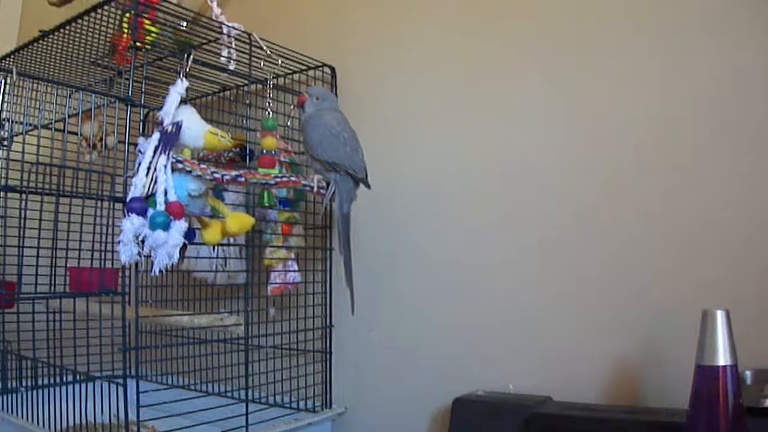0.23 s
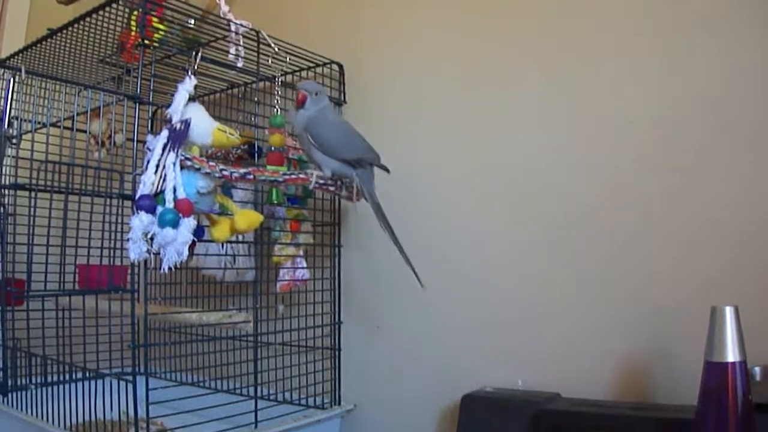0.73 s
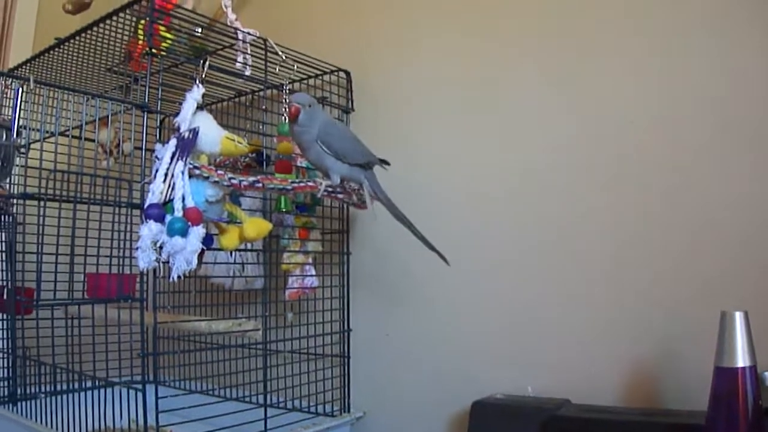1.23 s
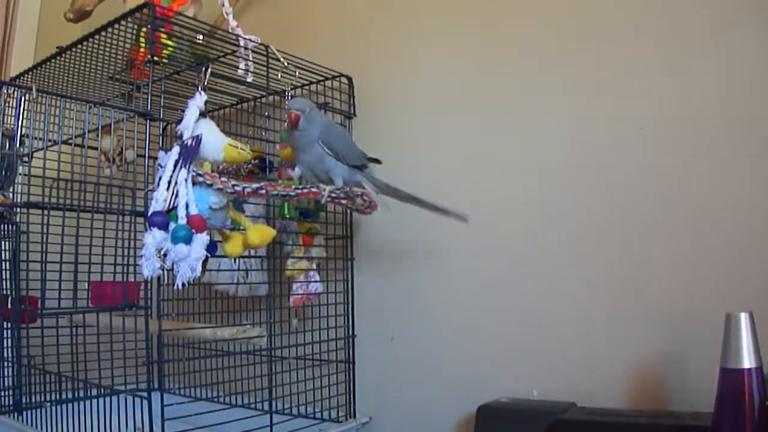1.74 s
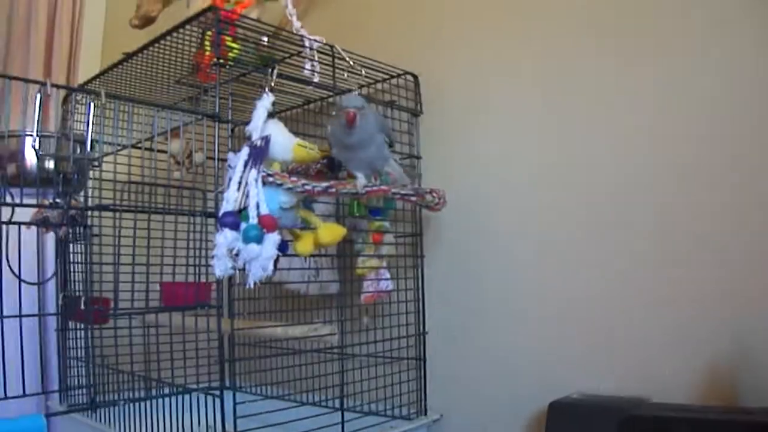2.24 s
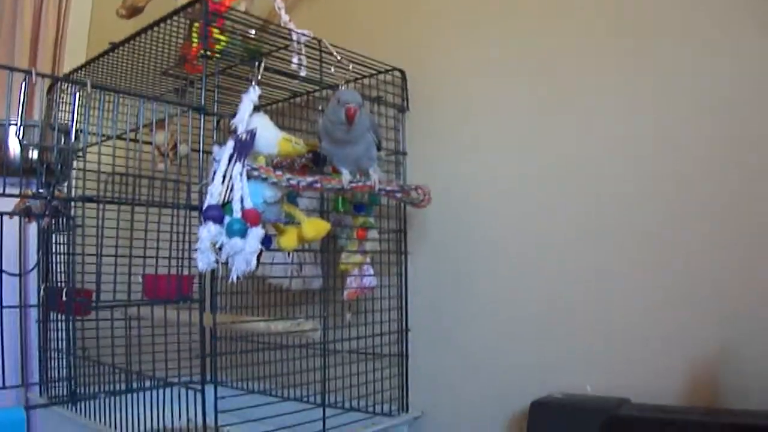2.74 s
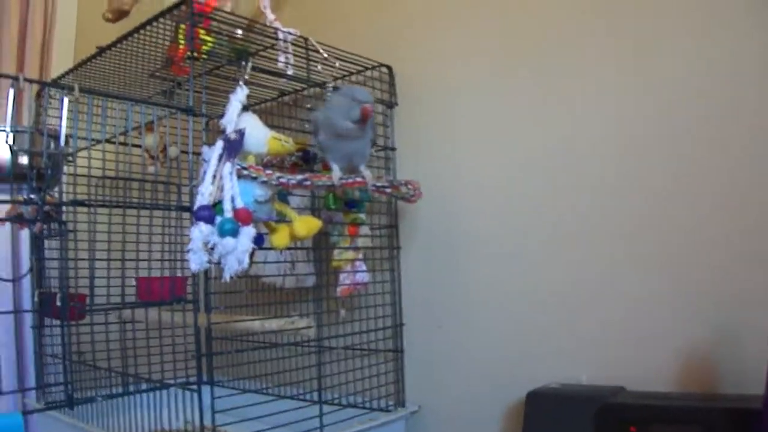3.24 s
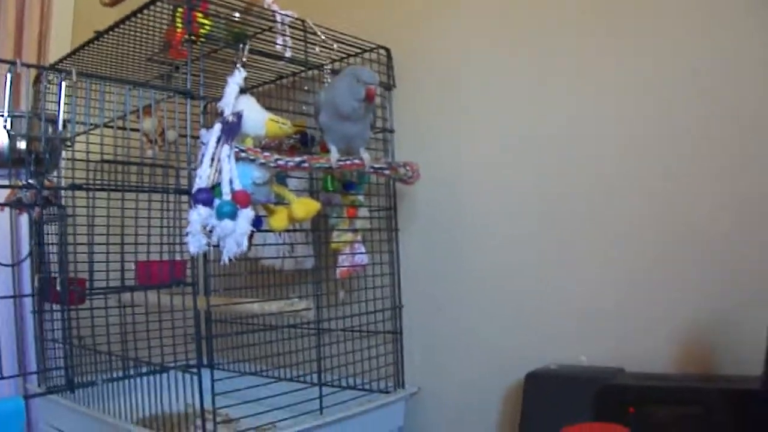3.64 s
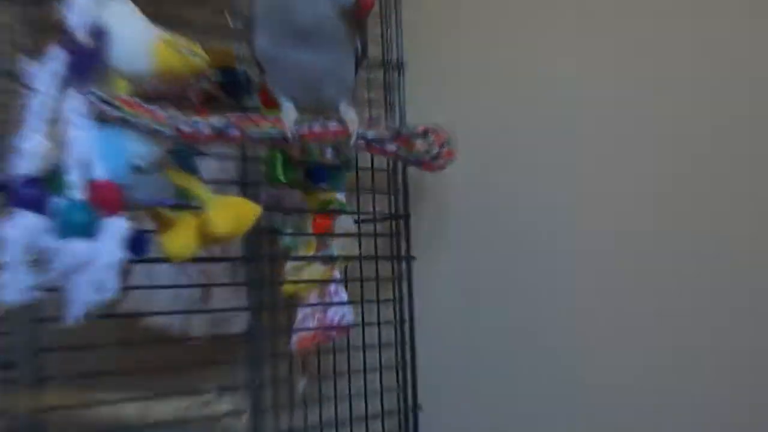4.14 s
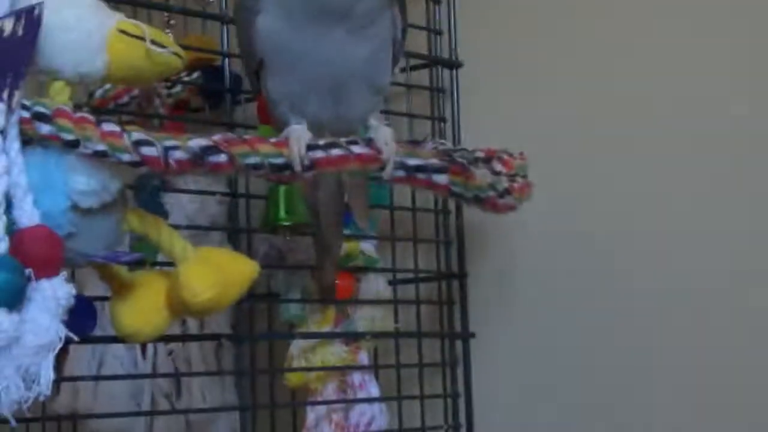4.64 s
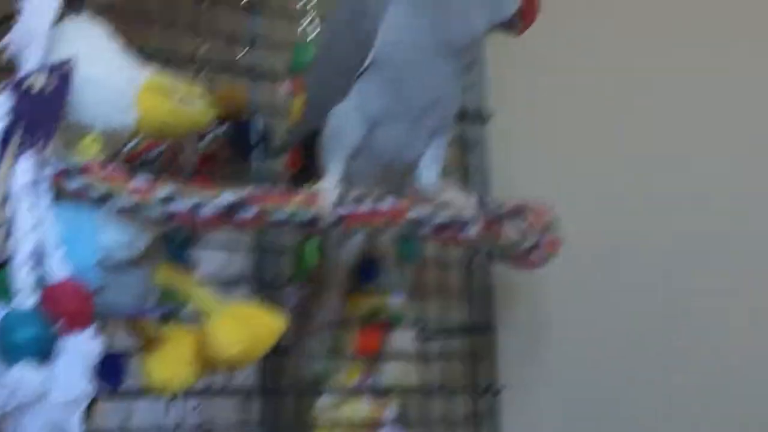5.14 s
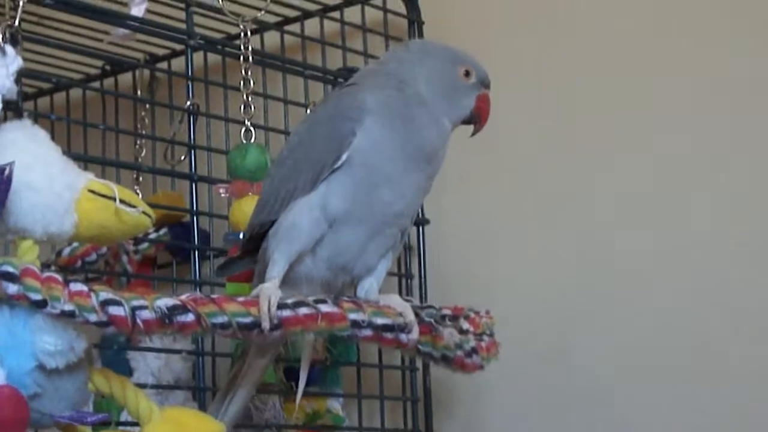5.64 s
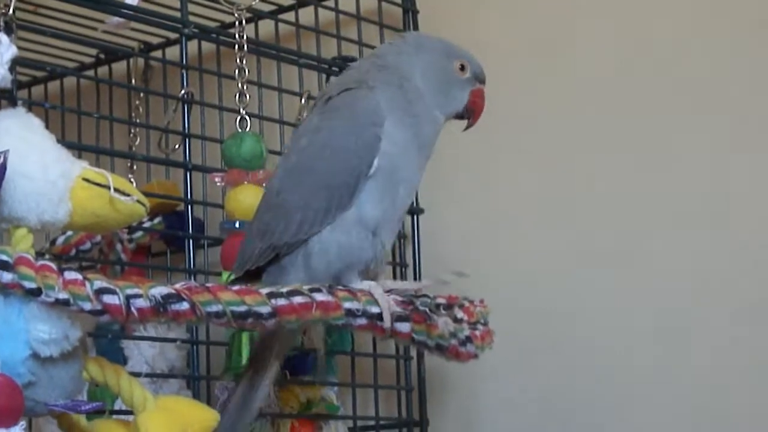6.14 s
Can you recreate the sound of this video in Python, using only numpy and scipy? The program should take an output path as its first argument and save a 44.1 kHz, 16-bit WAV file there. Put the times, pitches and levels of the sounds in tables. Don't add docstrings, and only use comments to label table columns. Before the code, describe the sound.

In a quiet hard-walled room, a parakeet a few metres away gives five loud squawks, each a quick rasp, high whistle and falling harsh note with short echoes. Over low hush, a small camera's built-in microphone picks up faint focus ticking and claw or feather rustles. After the second call a hard bright click precedes a motor whirr, which muffles the room and the third call; two more clear calls follow.

```python
import sys
import numpy as np
from scipy import signal
from scipy.fft import rfft, irfft, next_fast_len
from scipy.io import wavfile
from scipy.ndimage import uniform_filter1d, map_coordinates

SR = 44100
rng = np.random.default_rng(int(sys.argv[2]) if len(sys.argv) > 2 else 0)


def digitize_waveform(pressure):
    field = np.atleast_2d(pressure).T
    bounded = np.clip(field, -1, 1)
    quanta = np.round(bounded * 32767).astype(np.int16)
    wavfile.write(sys.argv[1], SR, quanta)


def voltage_ratio(decibels):
    exponent = np.asarray(decibels, float) / 20
    return 10 ** exponent


N = 281358
TIME = np.arange(N) / SR

# centre_hz, density_db (per Hz)
HUSH_SPECTRUM = [(24, -66), (40, -27), (175, -15.5), (337, -4), (619, -3.5), (747, -7), (1090, -3),
                 (1510, -9.5), (3420, -20), (4130, -21), (6590, -22.5), (7770, -25), (10800, -28),
                 (14000, -73.5), (22000, -120)]
# pitch_hz, unsteadiness_hz, level_db
HUM_LINES = [(60, 8, -86.5), (121, 13, -77), (244, 5, -72), (395, 20, -71), (985, 110, -63),
             (1100, 14, -58), (7920, 250, -69.5)]
HUSH_DB = -50

# start_s, length_s, low_tick_db, high_tick_db
FOCUS_HUNTS = [
    (.23, 0.1, -62, -64),
    (.33, 0.058, -78, -64),
    (.48, 0.17, -64, -63),
    (1.5, 0.16, -69, -64),
    (1.65, 0.27, -64.5, -60),
    (1.93, 0.25, -64.5, -60),
    (2.3, 0.29, -69, -64.5),
    (2.73, 0.63, -65, -63),
    (4.8, 0.28, -66, -65),
    (5.55, 0.25, -64, -61.5),
]
# start_s, length_s, level_db
PERCH_RUSTLES = [
    (.1, .15, -57),
    (.53, .07, -59.5),
    (.68, .05, -64),
    (1.87, .05, -58),
    (2.48, .1, -58.5),
    (2.63, 0.13, -55),
    (2.92, .04, -58),
    (4.88, .13, -58),
    (5.58, .05, -60.5),
]
# centre_hz, level_db
RUSTLE_SPECTRUM = [(1500, -35), (3000, -5), (4000, -2.5), (5000, -7), (6200, 2), (7500, -15), (10500, -17)]
FRAME_HZ = 59.94
SPELL_RAMP_S = 0.025

# start_s, snap_db, knock_over_snap_db, snap_tilt_db
BODY_CLICKS = [
    (.6232, -27.5, 0, -10),
    (3.4762, 2.5, -13.5, 4.5),
    (3.4778, -2, -17.5, 1),
    (3.662, -25.5, -5, -7),
    (3.9915, -44, 19, 0),
    (4.001, -48, 18, 0),
    (4.068, -46, 18, 0),
    (4.18, -50, 18, 0),
    (4.434, -42, 8.5, 0),
    (5.42, -54.5, 19, -14),
]

# rasp_start_s, whistle_start_s, falling_note_start_s, end_s
CALL_TIMES = [
    (.8935, .919, 1.110, 1.152),
    (3.0995, 3.128, 3.242, 3.318),
    (4.2445, 4.277, 4.390, 4.459),
    (5.0155, 5.05, 5.145, 5.221),
    (5.916, 5.962, 6.021, 6.114),
]
# rasp_db, whistle_db, whistle_fade_db, falling_note_db
CALL_EFFORT = [(0.5, 2.5, 4.5, 13.5), (-4, 1, 7, 11.5), (-2, 4, 6, 12), (-2.5, 1.5, 6.5, 8),
               (-2.5, -0.5, 9, 9.5)]
# after_onset_s, pulse_rate_hz, level_db
RASP_CLIMB = [(0, 560, -27), (.003, 620, -16), (.01, 900, -11), (.0155, 1600, -8), (.0215, 2250, -7)]
RASP_HOLD_HZ, RASP_HOLD_DB, RASP_MAX_S = 2420, -15, .036
# centre_hz, width_hz, level_db
THROAT_PEAKS = [(650, 500, -13), (2350, 550, 0), (4300, 900, -6), (6300, 1300, -8), (8300, 1200, -14)]
# start_hz, rise_s, crest_hz, end_hz
WHISTLE_ARCH = [(3420, .034, 3830, 2900), (3700, .026, 3895, 3560), (3530, .062, 3700, 3380),
                (3440, .054, 3655, 3470), (3560, .03, 3620, 3600)]
RISE_BEND, SAG_BEND = 1.6, 1.3
SWELL_S, SWELL_DB = 0.0085, 10
OVERTONE_DB, OVERTONE_GROWS_DB = -26, 14.5
# start_s, length_s, start_hz, end_hz, level_db
SIDE_TONES = [
    (.952, .018, 4950, 4600, -5),
    (.953, .02, 5710, 5360, -16),
    (1.102, .014, 5400, 5100, -9),
    (5.949, .01, 3600, 3500, -13),
    (5.98, .041, 3820, 4030, -9),
]
SIDE_FADES_DB_PER_S, SIDE_OVERTONE_DB = 200, -28
# second_partial_at_jump_hz, bend_lateness (exponent)
FALL_SHAPE = [(4390, 2.1), (4900, 2.2), (4770, 1.45), (4980, 1.8), (4790, 2.7)]
FUNDAMENTAL_WEIGHT = [6, 2.5, 5, 3, 3]
# pitch_hz, level_db
BEAK_RESPONSE = [(1450, -43.5), (1900, -28.5), (2200, -25.5), (2450, -25), (2900, -25), (3700, -11.5),
                 (4400, -17), (4900, -21)]
# pitch_hz, level_db
UPPER_PARTIALS = [(4000, -16), (6000, -8.5), (7500, -13.5), (9000, -9), (9800, -11), (11000, -15.5)]
FALL_END_HZ = 2920
FALL_SWELL_S, FALL_SWELL_DB = .01, 4

# centre_hz, t60_s
ROOM_DECAY = [(500, 0.25), (2000, 0.29), (4000, 0.36), (7000, 0.34), (11000, 0.3)]
# delay_s, level_db
EARLY_ECHOES = [(.0007, -9), (.0017, -10), (.004, -13), (.009, -14), (.016, -15), (.024, -17), (.033, -17),
                (.042, -13)]

# centre_hz, density_db (per Hz)
RUMBLE_SPECTRUM = [(47, -54), (80, -36), (118, -15), (151, -15.5), (320, -5), (581, -2.5), (1580, -8.5),
                   (2200, -18.5), (2860, -51), (4840, -120)]
# pitch_hz, unsteadiness_hz, level_db
GEAR_TONES = [(2340, 60, -9), (2750, 50, 0), (3280, 40, -4.5), (4340, 70, -10), (4730, 80, -14),
              (5090, 150, -7), (5800, 120, -15), (6640, 70, -15)]
# centre_hz, density_db (per Hz)
GEAR_HISS_SPECTRUM = [(1060, -36), (1800, -22), (2780, 1), (3840, -12), (5100, -8), (10800, -33),
                      (14000, -59), (22000, -120)]
# centre_hz, level_db
ZOOM_MUFFLE = [(800, -1.5), (2000, -4.5), (3600, -8.5), (5000, -14.5), (7000, -23), (10000, -26.5)]
ZOOM_START_S, ZOOM_END_S = 3.665, 4.5
STRAIN_S, STRAIN_WIDTH_S, STRAIN_DB = 4, 0.23, 4.5
RUMBLE_DB, GEAR_DB = -44.5, -47
MUFFLE_START_S, MUFFLE_END_S = 3.625, 4.507
SOUND_START_S = .094


def unit(x):
    return x / np.sqrt(np.mean(x ** 2) + 1e-20)


def along(points, hz):
    f, v = np.transpose(points)
    return np.interp(np.log(hz + 1), np.log(f + 1), v)


def wobble(rate, size=N):
    knots = rng.standard_normal(int(size * rate / SR) + 4)
    return map_coordinates(knots, [np.arange(size) * rate / SR])


def filtered(x, response):
    m = next_fast_len(N + SR // 2)
    return irfft(rfft(x, m) * response(np.fft.rfftfreq(m, 1 / SR)), m)[:N]


def noise(spectrum):
    return unit(filtered(rng.standard_normal(N), lambda hz: voltage_ratio(along(spectrum, hz))))


def peaks(table):
    def response(f):
        total = 0
        for k, (centre, width, db) in enumerate(table):
            damping = 1j * f * width
            total = total + (-1) ** k * voltage_ratio(db) * damping / (centre * centre - f * f + damping)
        return total
    return response


def spells(rows):
    total = 0
    for start, length, *db in rows:
        inside = np.minimum(TIME - start, start + length - TIME)
        total = total + voltage_ratio(np.array(db))[:, None] * np.clip(inside / SPELL_RAMP_S + .5, 0, 1)
    return total


def hush():
    lines = 0
    for hz, width, db in HUM_LINES:
        phase = 2 * np.pi * hz * TIME + 0.54 * wobble(width)
        lines = lines + voltage_ratio(db + 2.7 * wobble(5.7)) * np.sin(phase)
    breathing_db = HUSH_DB + 0.9 * wobble(2.66) + 1.3 * wobble(22)
    return voltage_ratio(breathing_db) * noise(HUSH_SPECTRUM) + np.sqrt(2) * lines


def rustle():
    (gain,) = spells(PERCH_RUSTLES)
    return gain * voltage_ratio(3.4 * wobble(29.29)) * noise(RUSTLE_SPECTRUM)


def focus():
    low_gain, high_gain = spells(FOCUS_HUNTS)
    beat = FRAME_HZ * (TIME - np.where(TIME < 5.42, .0064, -.0005))
    ticks = np.diff(np.floor(beat), prepend=0) * voltage_ratio(2.6 * wobble(60))
    low = unit(filtered(ticks, peaks([(4150, 2040, -1.07), (3420, 690, 0.57)])))
    high = unit(filtered(ticks, peaks([(7730, 290, -2.0), (6420, 210, 1)])))
    low_gain = low_gain * voltage_ratio(4 * wobble(12))
    return low_gain * low + high_gain * high


def clicks():
    low, mid, high = np.zeros((3, N))
    for start, db, knock_db, tilt_db in BODY_CLICKS:
        i = round(start * SR)
        low[i] = voltage_ratio(db + knock_db + 22.5)
        mid[i] = voltage_ratio(db - tilt_db + 10.5)
        high[i] = voltage_ratio(db + tilt_db + 3.0)
    knock = filtered(low, peaks([(910, 490, 0)]))
    snap = filtered(mid, peaks([(4720, 630, 0)]))
    snap -= filtered(high, peaks([(7160, 1300, 0.0), (10000, 2500, -12.5)]))
    return knock + snap


def note(rows, jitter):
    s, *columns = np.transpose(rows)
    span = slice(round(s[0] * SR), round(s[-1] * SR))
    t = TIME[span]
    hz, *rest = [np.interp(t, s, column) for column in columns]
    unsteady_hz = hz * (1 + jitter * wobble(396.4, size=len(t)))
    phase = 2 * np.pi * np.cumsum(unsteady_hz) / SR
    edge = np.clip(np.minimum(t - s[0], s[-1] - t) / .0025, 0, 1)
    return span, hz, phase, edge, rest


def partial(k, hz, phase, lag=0):
    return np.sqrt(2) * np.cos(k * phase + lag) * (k * hz < SR / 3)


def throat_breath():
    throat = peaks(THROAT_PEAKS)
    return unit(filtered(rng.standard_normal(N), lambda hz: throat(hz) * hz ** 4 / (hz ** 4 + 1100 ** 4)))


def rasp_rows(start, end, effort_db):
    end = max(min(end, start + RASP_MAX_S), start + .025)
    climb = [(start + s, hz, db + effort_db) for s, hz, db in RASP_CLIMB]
    return climb + [(end, RASP_HOLD_HZ, RASP_HOLD_DB + effort_db)]


def rasps(breath):
    out, throat = np.zeros(N), peaks(THROAT_PEAKS)
    for times, effort in zip(CALL_TIMES, CALL_EFFORT):
        span, hz, phase, edge, (db,) = note(rasp_rows(*times[:2], effort[0]), jitter=.07)
        gains = [throat(k * hz) for k in range(1, 21)]
        pulses = sum(abs(g) * partial(k + 1, hz, phase, np.angle(g)) for k, g in enumerate(gains))
        pulses /= -np.sqrt(sum(abs(g) ** 2 for g in gains))
        puffs = breath[span] * (1 + np.cos(phase))
        level = voltage_ratio(db + 3 * wobble(250, size=len(hz)))
        out[span] += level * edge * (pulses + .3 * puffs)
    return out


def whistle_rows(start, end, level_db, fade_db, start_hz, rise, crest_hz, end_hz):
    t = np.linspace(0, end - start, num=40)
    up = np.clip(1 - t / rise, 0, 1)
    down = np.clip((t - rise) / (t[-1] - rise), 0, 1)
    hz = crest_hz - (crest_hz - start_hz) * up ** RISE_BEND - (crest_hz - end_hz) * down ** SAG_BEND
    db = level_db - SWELL_DB * np.clip(1 - t / SWELL_S, 0, 1) - fade_db * t / t[-1]
    return np.transpose([start + t, hz, db, OVERTONE_DB + OVERTONE_GROWS_DB * t / t[-1]])


def side_tone_rows(start, length, start_hz, end_hz, db):
    end_db = db - SIDE_FADES_DB_PER_S * length
    return [(start, start_hz, db, SIDE_OVERTONE_DB), (start + length, end_hz, end_db, SIDE_OVERTONE_DB)]


def whistles(breath):
    out = np.zeros(N)
    rows_list = []
    for times, effort, arch in zip(CALL_TIMES, CALL_EFFORT, WHISTLE_ARCH):
        rows_list.append(whistle_rows(*times[1:3], *effort[1:3], *arch))
    for tone in SIDE_TONES:
        rows_list.append(side_tone_rows(*tone))
    for rows in rows_list:
        span, hz, phase, edge, (db, over_db) = note(rows, jitter=0.0022)
        third = .4 * partial(3, hz, phase) * voltage_ratio(4 * wobble(50, size=len(hz)))
        overtones = partial(2, hz, phase) + third + .25 * breath[span]
        flutter_db = 1.6 * wobble(150, size=len(hz))
        out[span] += voltage_ratio(db + flutter_db) * edge * (partial(1, hz, phase) + voltage_ratio(over_db) * overtones)
    return out


def fall_rows(start, end, top_hz, bend):
    u = np.linspace(0, 1, num=30)
    return np.transpose([start + u * (end - start), top_hz - (top_hz - FALL_END_HZ) * u ** bend])


def falling_notes(breath):
    out = np.zeros(N)
    for times, effort, shape, low_db in zip(CALL_TIMES, CALL_EFFORT, FALL_SHAPE, FUNDAMENTAL_WEIGHT):
        span, hz, phase, edge, _ = note(fall_rows(*times[2:], *shape), jitter=0.01034)
        hz, phase = hz / 2, phase / 2
        size = len(hz)
        since_s = np.arange(size) / SR
        stack = partial(2, hz, phase) + 0.14 * breath[span]
        for k in range(3, 8):
            upper_db = along(UPPER_PARTIALS, k * hz) - 3 * (k - 3) + 4.5 * wobble(70, size=size)
            stack += voltage_ratio(upper_db) * partial(k, hz, phase)
        skip = 1 + .4 * np.exp(-since_s / 0.005) * np.cos(phase / 2)
        swell_db = -FALL_SWELL_DB * np.exp(-since_s / FALL_SWELL_S) + 1.8 * wobble(129.3, size=size)
        low = voltage_ratio(low_db + along(BEAK_RESPONSE, hz)) * partial(0.99, hz, phase)
        high = voltage_ratio(along(BEAK_RESPONSE, 2 * hz)) * skip * stack
        out[span] += voltage_ratio(effort[-1] + swell_db) * edge * (high + low)
    return out


def parakeet():
    breath = throat_breath()
    voice = rasps(breath) + whistles(breath) + falling_notes(breath)
    return filtered(voice, lambda hz: hz ** 6 / (hz ** 6 + 430 ** 6))


def room(x, wet_db):
    hz, t, z = signal.stft(rng.standard_normal(SR), SR, nperseg=256)
    decay = voltage_ratio(-60 * t / along(ROOM_DECAY, hz)[:, None])
    build_up = 1 - np.exp(-(t / 0.035) ** 2)
    tail = signal.istft(z * decay * build_up, SR, nperseg=256)[1]
    tail *= voltage_ratio(1.5 * wobble(160, size=len(tail)))
    response = voltage_ratio(wet_db) * tail / np.linalg.norm(tail)
    for delay, db in [(0, 0.013)] + EARLY_ECHOES:
        response[round(delay * SR)] += voltage_ratio(db)
    return signal.fftconvolve(x, response)[:N]


def zoom():
    strain_db = STRAIN_DB * np.exp(-((TIME - STRAIN_S) / STRAIN_WIDTH_S) ** 2)
    rumble = unit(voltage_ratio(0.83 * wobble(51)) * noise(RUMBLE_SPECTRUM))
    turning = np.cumsum(1 + .011 * wobble(14)) / SR
    tones = 0
    for hz, width, db in GEAR_TONES:
        phase = 2 * np.pi * hz * turning + .5 * wobble(width / 2)
        tones = tones + voltage_ratio(db + 2 * wobble(15)) * np.sin(phase)
    gears = unit(unit(tones) + .95 * noise(GEAR_HISS_SPECTRUM))
    slowing = np.clip((ZOOM_END_S - TIME) / 0.21, 0, 1) * (TIME > ZOOM_START_S)
    return slowing * (voltage_ratio(RUMBLE_DB + strain_db) * rumble + voltage_ratio(GEAR_DB + 1.3 * wobble(23)) * gears)


def excess_db(x, over_db, window):
    step = 1 / (window * SR)
    power = signal.lfilter([step], [1, step - 1], x ** 2)
    return np.maximum(10 * np.log10(power + 1e-12) - over_db, 0)


def gain_control(x):
    cut_db = 0.62 * excess_db(x, over_db=-22, window=0.0093)
    ramp = 90 * TIME
    return uniform_filter1d(voltage_ratio(ramp - np.maximum.accumulate(cut_db + ramp)), size=160)


def overload(x):
    held = x * voltage_ratio(-.7 * excess_db(x, over_db=-14, window=.003))
    rounded = held / (1 + np.abs(held / .72) ** 5) ** (1 / 5)
    thump = voltage_ratio(-2) * filtered(rounded - held, lambda hz: 1 / (1 + (hz / 120) ** 2))
    x = x + thump + filtered(rounded - x, lambda hz: hz ** 4 / (hz ** 4 + 350 ** 4))
    return x + 0.018 * filtered(x ** 2, lambda hz: hz ** 2 / (hz ** 2 + 180 ** 2) * (hz < 1500))


def scene():
    return (room(parakeet(), wet_db=-9.5) + hush() + focus() + rustle())[None]


def low_pass(x):
    return signal.sosfilt(signal.butter(12, 10930, fs=SR, output="sos"), x)


def record(dry):
    gain = gain_control(dry[0])
    x = overload(dry[0] * gain)
    muffled = (TIME > MUFFLE_START_S) & (TIME < MUFFLE_END_S)
    x = np.where(muffled, filtered(x, lambda hz: voltage_ratio(along(ZOOM_MUFFLE, hz))), x)
    circuit = voltage_ratio(-62) * muffled * rng.standard_normal(N)
    x = x + gain * zoom() + np.sqrt(gain) * circuit + clicks()
    x = x * (TIME > SOUND_START_S)
    return low_pass(x[None])


dry = scene()
out = record(dry)
digitize_waveform(out)
```